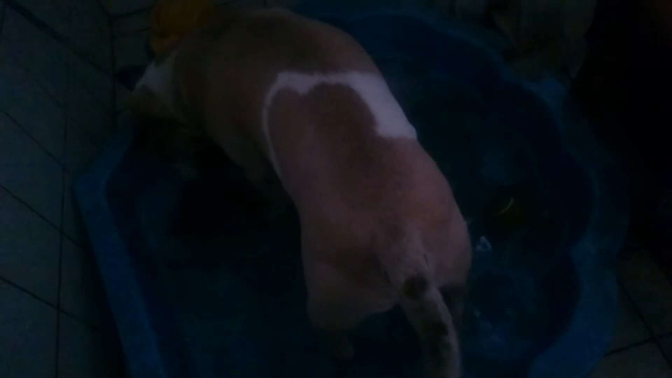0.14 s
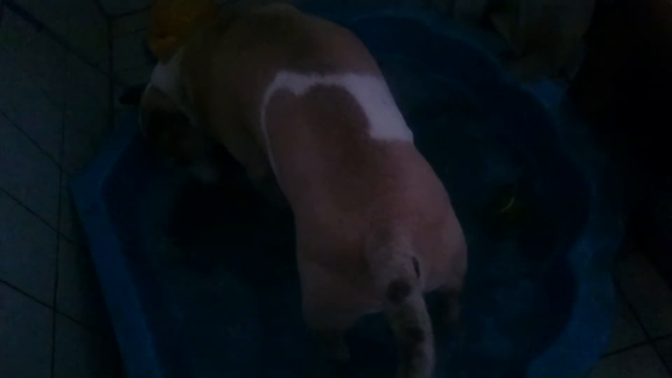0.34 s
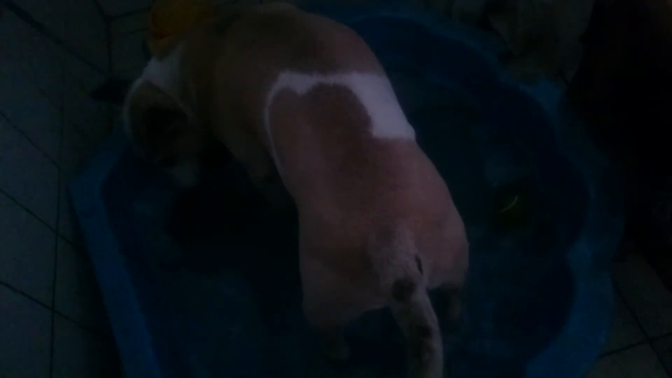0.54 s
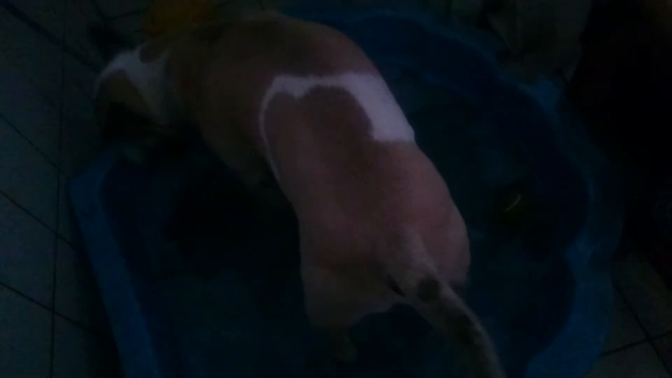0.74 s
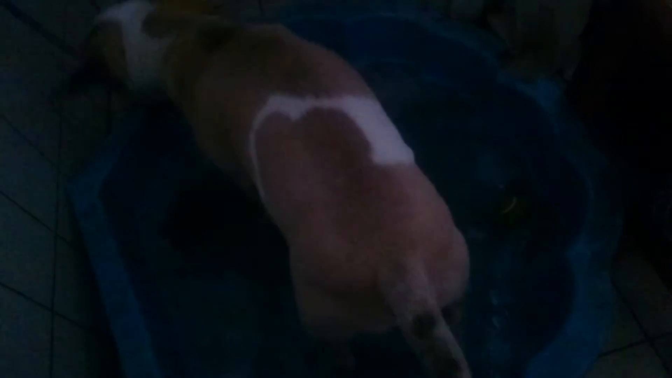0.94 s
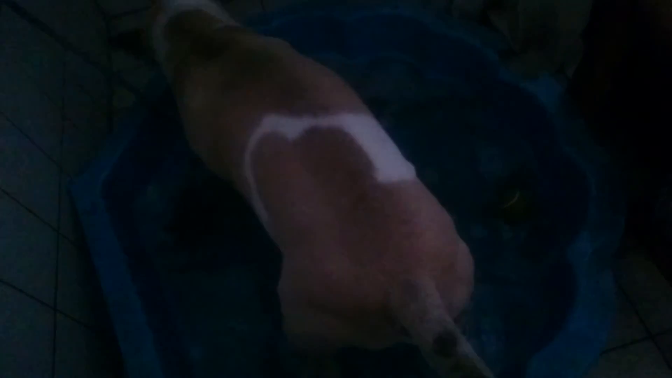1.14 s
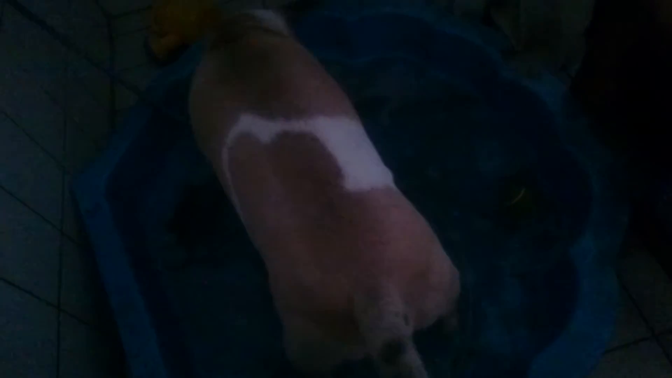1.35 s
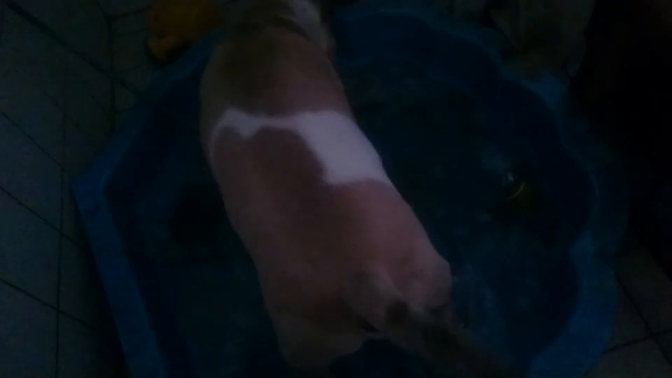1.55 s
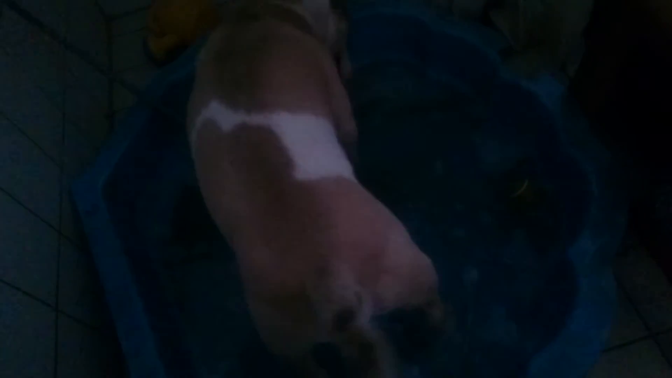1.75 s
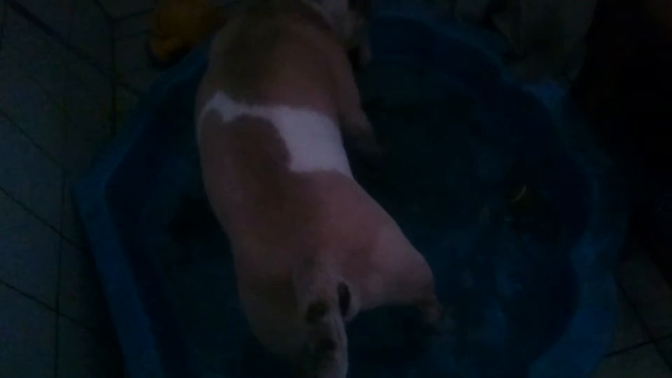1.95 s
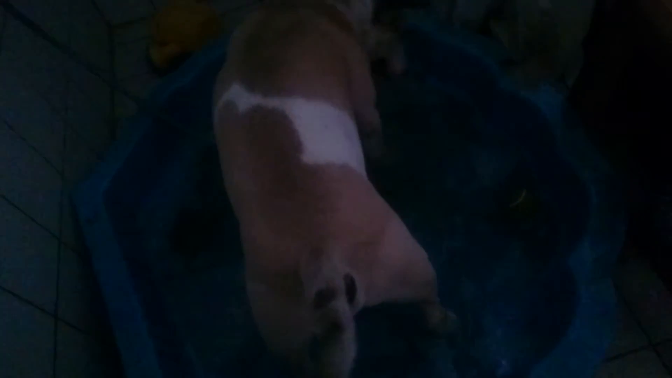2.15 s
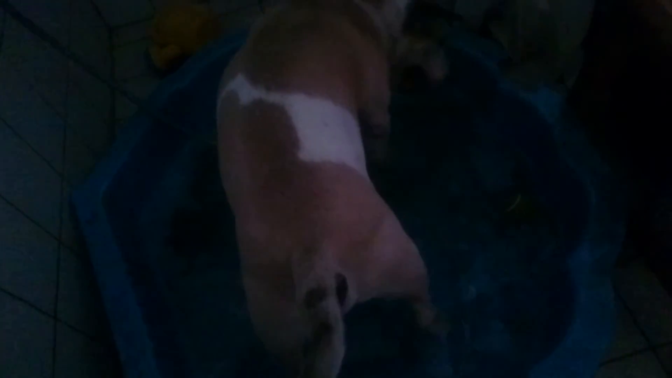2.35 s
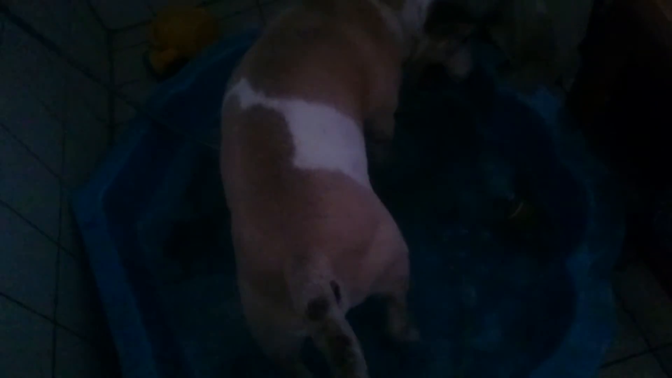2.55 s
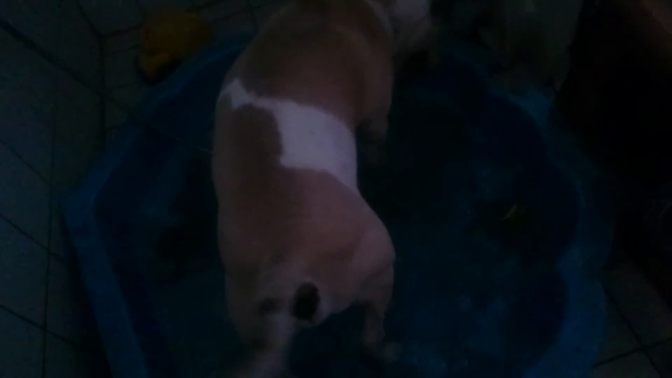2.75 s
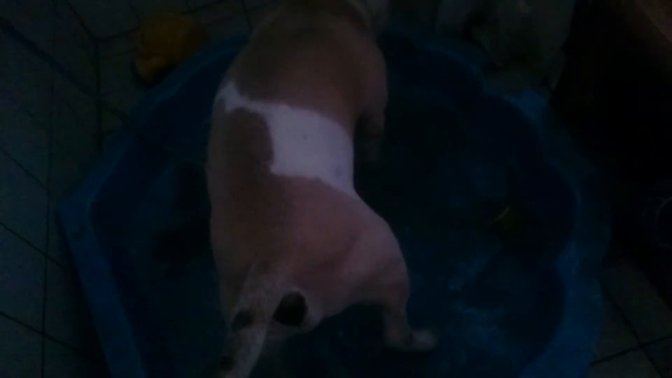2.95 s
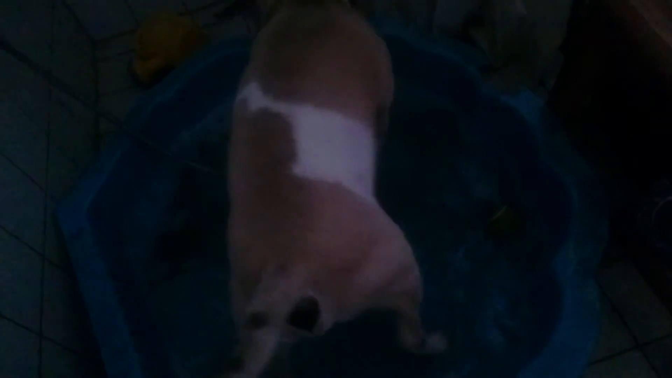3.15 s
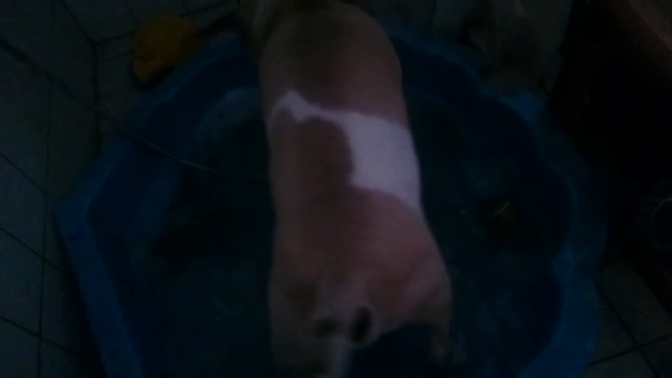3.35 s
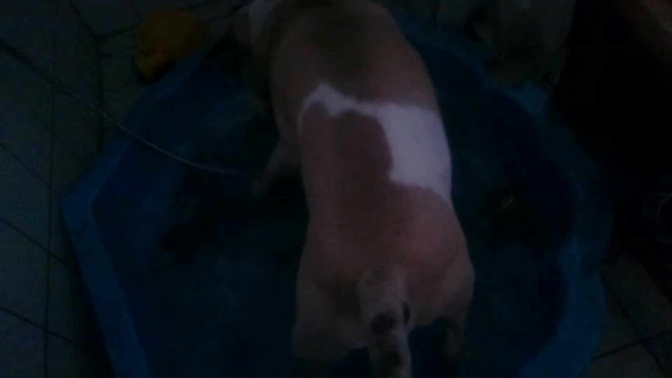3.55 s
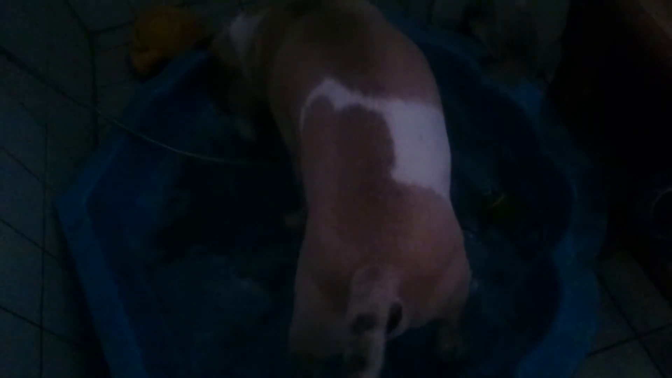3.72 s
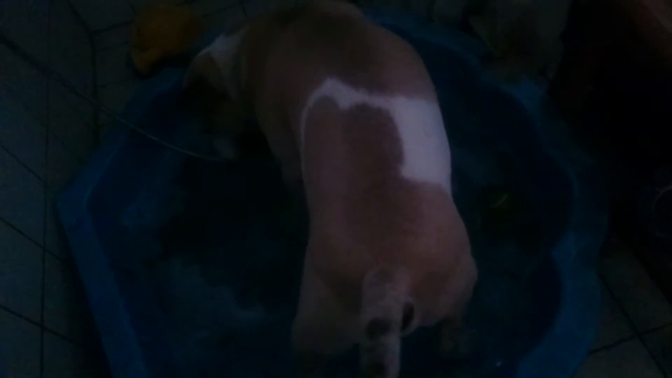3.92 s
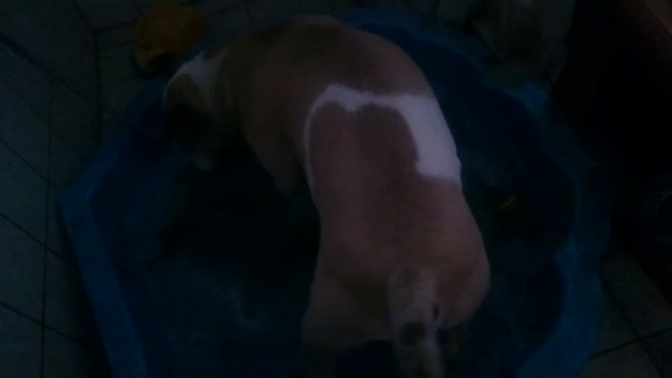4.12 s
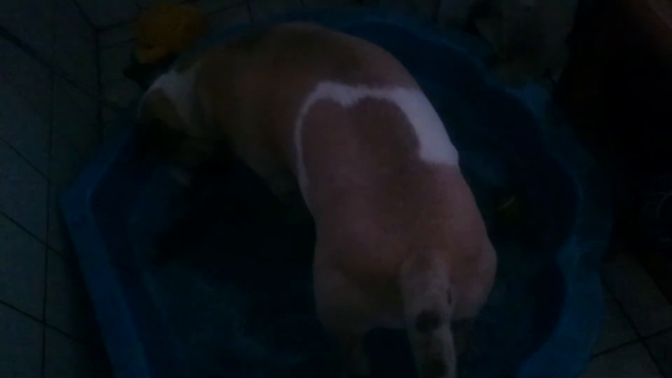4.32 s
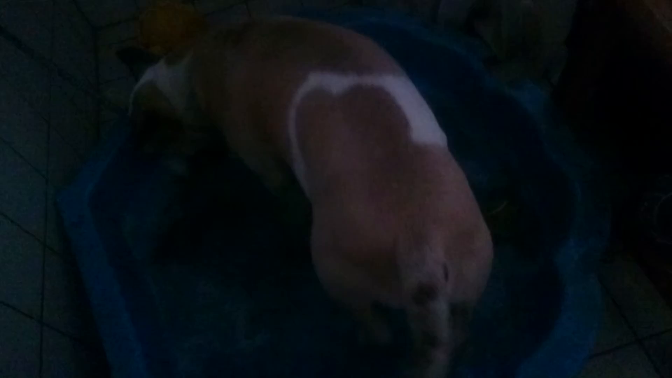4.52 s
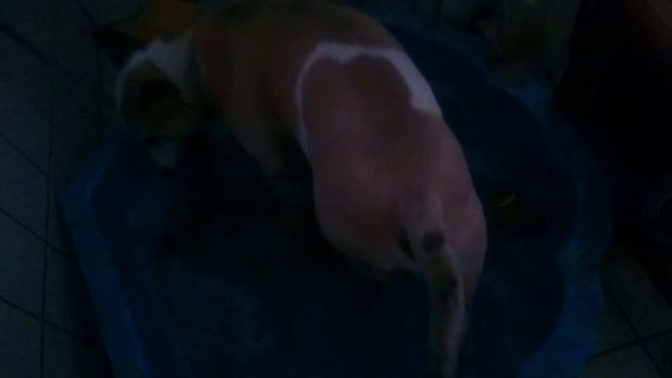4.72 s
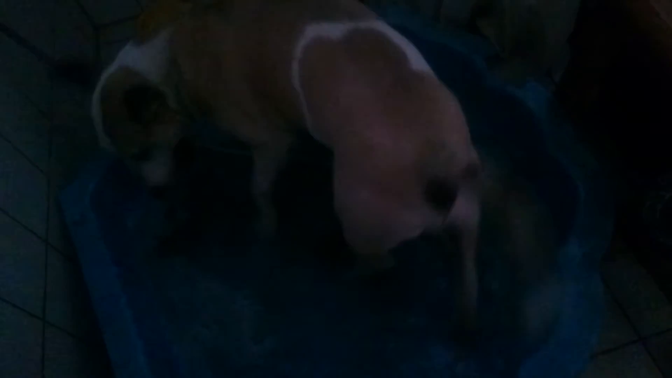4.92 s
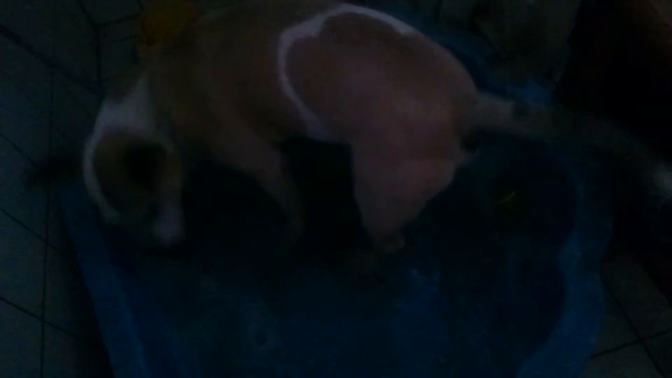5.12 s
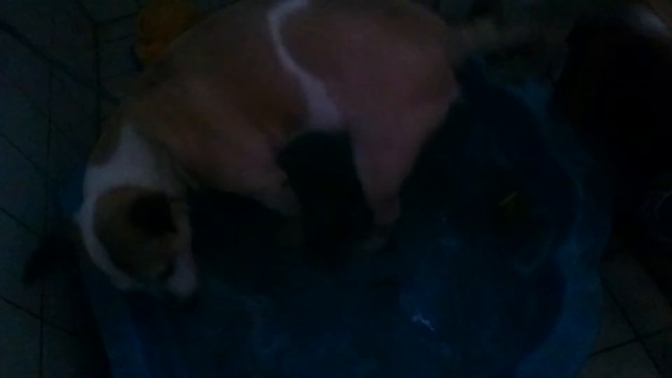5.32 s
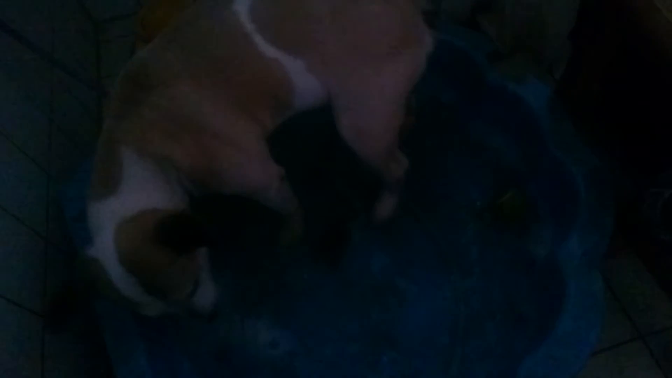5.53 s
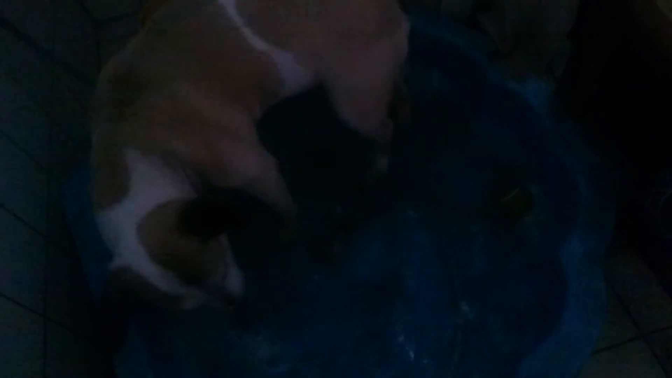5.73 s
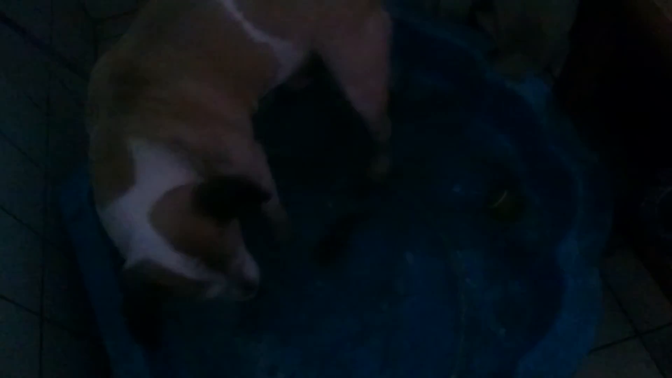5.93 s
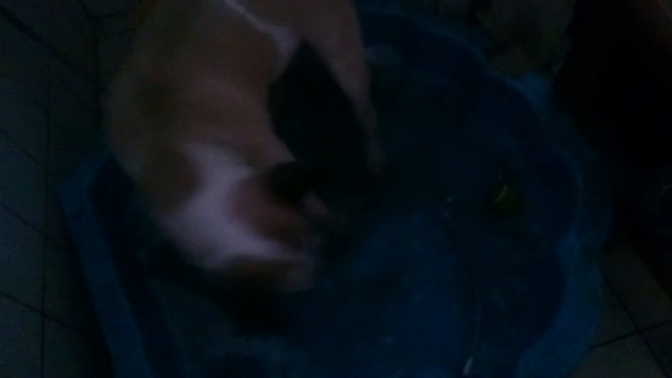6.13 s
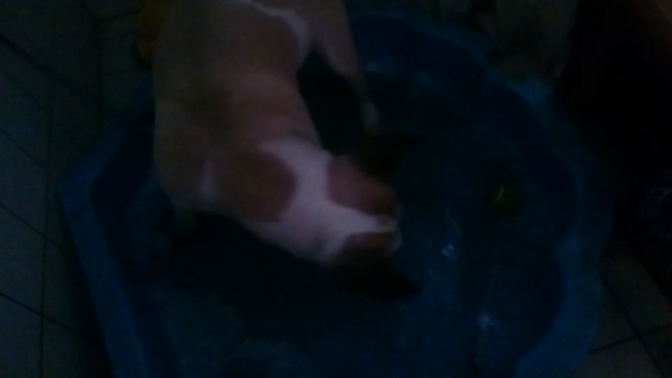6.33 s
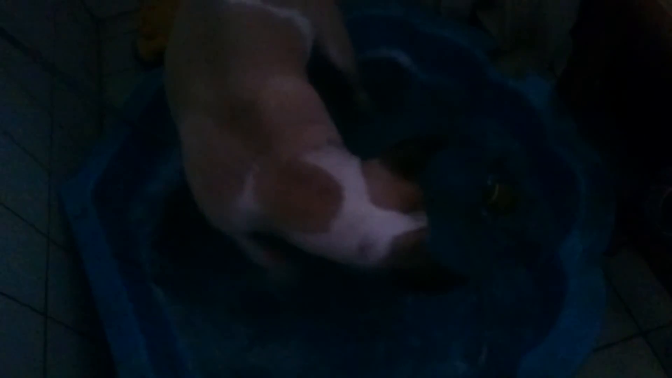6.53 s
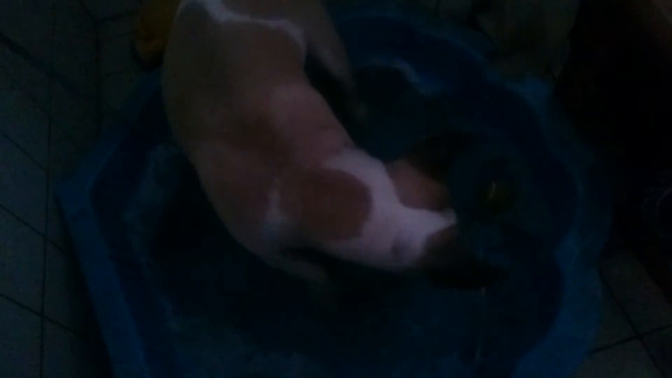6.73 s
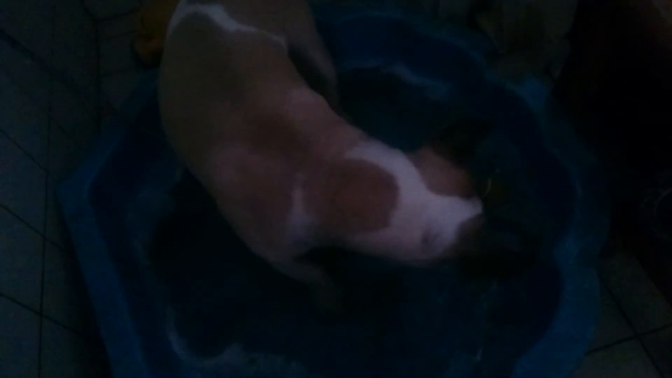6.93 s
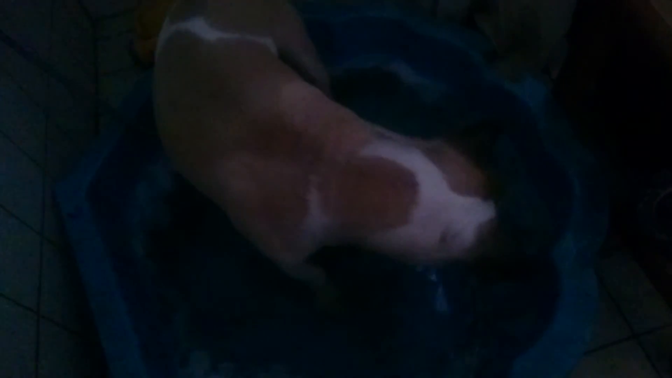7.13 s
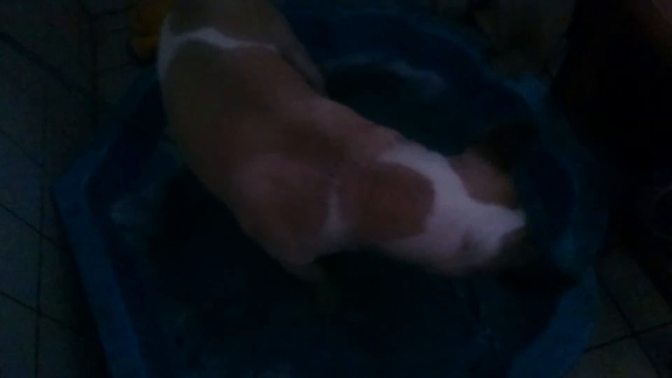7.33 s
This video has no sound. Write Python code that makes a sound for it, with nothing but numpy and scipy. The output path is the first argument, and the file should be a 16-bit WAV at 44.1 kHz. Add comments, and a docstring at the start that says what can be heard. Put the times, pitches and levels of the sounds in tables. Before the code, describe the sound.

Close, breathy panting, about three pants a second, runs throughout with brief gaps. Around it, water surges in short irregular bursts of bright spray, round bubble plops and ringing glugs, sharpest around four seconds and densest from five to six and a half. Paws thud on wet plastic. Distant echoing barks and steady faint hiss sit behind, in a short, lively tiled room.

```python
"""A tiled room with a shallow plastic pool: a panting dog steps about close to a two-port microphone.
Surges of spray, bubbles and slosh are built from crowds of small ringing bubbles.
Single plops, ringing glugs and knocks on the plastic floor stand out; each is a decaying tone.
Pants are noise through throat resonances. Far off another dog barks in three gliding partials.
Random-tap echoes place it all in the room, over a steady bed of air noise."""
import sys
import numpy as np
from scipy import signal
from scipy.fft import rfft, irfft, next_fast_len
from scipy.io import wavfile
from scipy.ndimage import uniform_filter1d

SR = 44100
rng = np.random.default_rng(int(sys.argv[2]) if len(sys.argv) > 2 else 0)


def master_out(mix):
    """Clip the mix to full scale and print it as 16-bit PCM to the path in sys.argv[1]."""
    frames = np.transpose(np.atleast_2d(mix))
    ceiling = np.clip(frames, -1, 1)
    pcm = np.round(ceiling * 32767).astype(np.int16)
    wavfile.write(sys.argv[1], SR, pcm)


N = 329494  # samples

# All levels are source levels, ahead of the final mix.
# spectrum of the air bed: (frequency [Hz], relative density [dB per Hz])
AIR = [(15, -40), (30, -8), (52, -3), (85, -3), (150, -6), (300, -11), (700, 1.5), (1200, -2), (2300, 0.5),
       (3800, -6.5), (5500, -15.5), (8500, -11.5), (11500, -29.5), (16000, -34)]
AIR_DB = -60

# distant barks: (time [s], length [s], first pitch [Hz], pitch it climbs towards [Hz],
# level of partial 1 [dB], of partial 2 [dB], of partial 3 [dB])
BARKS = [(.0, 0.099, 334, 370, -62.5, -47, -46.5), (0.285, 0.15, 349.6, 385, -72, -45, -46.5),
         (0.58, 0.14, 344.4, 398, -62.5, -53, -45), (0.795, 0.076, 408, 427, -90, -76, -54),
         (2.51, 0.059, 343, 391, -60.5, -48.5, -47.5), (4.792, 0.097, 369, 417.6, -55, -45, -47),
         (5.955, 0.076, 412, 435.4, -58, -35, -61)]

# echo of the tiles, before each source stretches it: (frequency [Hz], time to fall 60 dB [s])
TILES = [(200, 0.92), (700, 0.23), (2000, 0.21), (5000, 0.2), (12000, 0.18)]

# pants: (time near the middle of the breath out [s], nominal length [s], level [dB],
# mouth opening as a factor on the throat resonances [ratio], level of the breath in [dB])
PANTS = [(0.11, 0.056, -42.5, 0.95, -52.5), (0.389, 0.093, -43, 0.98, -55), (0.697, 0.1, -47.5, 0.95, -56),
         (1.032, 0.084, -43, 0.99, -66), (1.385, 0.1, -40, 1.01, -63), (1.694, 0.085, -39, 1, -56),
         (2.291, 0.13, -42, 0.98, -55.5), (2.629, 0.11, -39, 0.97, -56), (2.975, 0.11, -44, 1.13, -67),
         (3.302, 0.1, -40, 1, -57.5), (3.622, 0.1, -38.5, 0.93, -53.5), (4.317, 0.075, -36.5, 1.066, -52.5),
         (4.702, 0.18, -43.5, 1.176, -45), (5.066, 0.11, -41, 0.96, -50.5),
         (5.296, 0.095, -37.5, 1.32, -56), (6.172, 0.11, -36.5, 0.96, -56), (6.72, 0.081, -35, 1.04, -70),
         (7.134, 0.082, -43.5, 1.04, -52)]
# throat resonances at mouth opening 1: (frequency [Hz], width of the first pass [Hz], level [dB])
THROAT = [(283, 59, -14.5), (626, 112, -3), (1180, 130, 6), (1550, 252, 8.5), (2240, 360, 2),
          (2542, 490, 7), (3030, 310, 2.5), (3785, 410, 1), (4320, 480, -8)]
BREATH_HISS_DB = -21  # hiss at the teeth
# the soft breath in: delay and nominal length, and its narrower mouth
IN_LATE_S, IN_LENGTH_S, IN_MOUTH = 0.17, 0.13, 0.867

# paws knocking the plastic floor: (time [s], level [dB], starting pitch [Hz])
KNOCKS = [(1.435, -30, 645), (1.806, -40, 570), (3.034, -17.5, 510), (3.469, -29, 554), (5.557, -37, 780),
          (5.784, -40, 215), (5.95, -21.5, 655), (6.334, -24, 784), (6.349, -39, 191), (6.69, -37, 380),
          (7.389, -35.5, 653)]
# modes of the plastic sheet: (factor on the knock pitch [ratio], level [dB])
SHEET = [(.375, -28), (.62, -10), (1, -5)]

# large pockets of air that ring on: (time [s], level [dB], starting pitch [Hz])
GLUGS = [(1.586, -35.5, 1600), (2.799, -38, 1094), (2.824, -32, 1534), (2.925, -38.5, 597),
         (3.085, -29, 655), (3.859, -36, 1210), (3.976, -47, 283), (4.225, -31, 1800), (4.575, -25, 2060),
         (4.69, -32, 550), (4.70, -21.5, 883), (4.825, -22.5, 3010), (5.345, -34, 661),
         (5.384, -20.5, 1740), (5.64, -40, 890), (5.865, -37, 1720), (6.154, -17.5, 1338),
         (6.283, -40, 485), (6.46, -29.5, 586), (6.545, -22, 1090), (6.889, -31.5, 1043), (7.125, -52, 565)]
GLUG_CYCLES, GLUG_RISE = 13, 0.018  # ring length [cycles], pitch climb [ratio]

# surges of water pushed by a paw: (time of the crest [s], rise [s], hold [s],
# spray level [dB], bubbles level [dB], slosh level [dB])
SURGES = [(1.44, 0.033, 0.094, -81, -51, -79), (1.556, 0.12, .02, -60, -53, -78),
          (1.764, 0.018, 0.027, -50, -32.5, -70), (1.802, 0.055, 0.016, -35.5, -23, -36),
          (1.965, 0.32, 0.021, -61, -37.5, -59), (2.121, 0.18, 0.13, -49.5, -40.5, -49),
          (2.798, .03, 0.027, -72, -52, -75), (2.949, 0.11, 0.044, -50, -41, -62),
          (3.034, 0.13, 0.022, -44, -30, -36), (3.462, 0.022, .005, -82, -54.5, -53.5),
          (3.786, 0.039, 0.034, -55, -46.5, -77), (3.857, 0.082, 0.065, -42.5, -42, -77),
          (3.922, 0.018, 0.019, -42, -34, -53), (3.977, 0.026, 0.0026, -31, -51, -46),
          (3.997, 0.019, 0.004, -62, -29.5, -42), (4.122, 0.13, 0.13, -61.5, -49.5, -100),
          (4.567, 0.034, 0.0044, -71, -43.5, -80), (4.681, 0.094, 0.012, -43.5, -33.5, -43),
          (4.943, .02, 0.043, -53, -49, -75), (5.104, 0.29, 0.084, -82, -52.5, -48),
          (5.287, 0.15, 0.029, -37.5, -34.5, -48), (5.4, 0.11, .07, -42, -35.5, -48),
          (5.481, 0.068, 0.0043, -34, -27, -53), (5.555, 0.072, 0.0064, -31, -26, -34.5),
          (5.634, .1, 0.028, -34, -32, -54), (5.681, 0.055, 0.065, -33, -31.5, -53.5),
          (5.954, 0.1, .005, -56, -42.5, -43.5), (6.16, 0.14, 0.13, -45.5, -37, -57),
          (6.34, 0.061, 0.0075, -33, -24.5, -28.5), (6.403, .1, 0.083, -40, -33.5, -46.5),
          (6.53, 0.15, .08, -64.5, -43, -44.5), (6.692, 0.11, 0.21, -46, -41.5, -55.5),
          (6.953, 0.056, 0.0064, -58, -43.5, -56), (7.212, 0.083, 0.11, -64, -46.5, -76),
          (7.335, .1, 0.099, -61.5, -49.5, -55.5), (7.454, 0.072, .05, -45, -53, -52)]
RISE_DB = 30  # a surge climbs this far during its rise
# fall after the hold, one entry each for spray, bubbles, slosh: (time to fall 60 dB [s])
SETTLE_T60_S = [0.27, 0.36, 0.25]
# relative spectra of the stirred water: (frequency [Hz], density [dB per Hz])
SPRAY = [(2500, 7.5), (4600, 1), (7000, 0), (10400, -5), (13200, -9), (15300, -5), (16000, -4)]
BUBBLES = [(350, -41), (600, -21.5), (1100, -0.4), (2000, -2.5), (3600, -4.5), (4500, -13), (6500, -25),
           (9000, -24)]
SLOSH = [(90, -24), (200, -24), (400, -12.5), (640, 1.6), (950, 4), (1500, -15)]
# slow waves drumming on the pool floor: (frequency [Hz], relative density [dB per Hz])
RUMBLE = [(40, -28), (62, -18), (85, -8), (120, -11.5), (200, -22)]
RUMBLE_DB = -18  # over the smoothed slosh level
SPREAD_LAG = 14  # samples, either way, for sources across the pool

# plops and slaps: (time [s], level [dB], starting bubble pitch [Hz],
# smack level over the bubble [dB], left minus right [dB])
PLOPS = [(0.238, -30, 4500, -23, 5), (0.45, -22.5, 3010, -34, -1), (1.473, -30, 2100, -24, 3),
         (1.751, -17, 2280, -13.5, 4), (1.759, -13.5, 1290, -20, -4), (1.789, -18, 1080, -37, -23),
         (1.798, -13, 1070, -6.5, 4.5), (1.812, -14.5, 1420, -32, -5), (1.984, -15.5, 917, -40, 0),
         (2.081, -30.5, 1550, -11, 1), (2.14, -21.5, 2770, -6, 6), (2.152, -15, 1308, -39, 8.5),
         (2.259, -42, 2110, 0, .1), (2.803, -32, 3490, -31, 2), (2.912, -23.5, 2620, -18, .1),
         (3.024, -20, 2030, -39, -3), (3.046, -14, 1495, -12.5, 0), (3.777, -35, 1910, -31, -8),
         (3.84, -22.5, 2110, -18.5, 0), (3.92, -12.5, 3320, -14.5, 2), (3.956, -20, 838, -4.5, -7),
         (3.995, -9.5, 1430, -10, -1), (3.997, -10.5, 2920, -12, 7), (4.006, -4.5, 2610, -26, -15.5),
         (4.199, -32, 1940, -7, 3), (4.561, -38, 2000, -6.5, 3), (4.679, -30.5, 805, -28, -15),
         (4.965, -25.5, 2240, 0.5, -3.5), (5.03, -33, 1290, -58, -15), (5.169, -29.5, 1290, -34, 2),
         (5.211, -33, 1170, -4.5, 3), (5.349, -28, 1080, -13, -9), (5.469, -11.5, 2900, -19.5, -10.5),
         (5.56, -17, 3360, -25, -11), (5.67, -11.5, 3440, -5, 1), (5.743, -21, 2070, -11, -1),
         (5.78, -13, 2030, -21, 1), (5.916, -33, 1550, -20, 6), (5.958, -25.5, 1405, -6.5, -1),
         (6.144, -21.5, 1380, -27, -2.5), (6.32, -9.5, 2195, -20, 4), (6.336, -21, 1120, -28, 3),
         (6.355, -15.5, 1310, -21, -11), (6.388, -19, 3600, -9, 1), (6.463, -15, 1710, -23, 4),
         (6.679, -27, 1450, -23, -8), (6.83, -33, 2300, 5, 3.5), (6.955, -21, 2420, -8.5, 2.5),
         (7.196, -29.5, 2550, -22, -3), (7.217, -21, 1407, -38, -3), (7.279, -22, 1490, -34, -1),
         (7.441, -29, 3520, -1, 1.5)]
# spray of the smack: (frequency [Hz], relative density [dB per Hz])
SMACK = [(500, -29), (1200, -63), (2500, 4), (5000, 3), (9000, -4.5), (13000, -12.5), (15500, -9)]
PLOP_T60_S, SMACK_RISE_S = 0.036, 0.0011  # fall of smack and froth, attack of the smack
FROTH_S, FROTH_DB = 0.02, 1.5  # neighbours burst within this time, starting at this level over the bubble

PORT_LAG = 24  # samples by which the right port hears near sources later
# stereo width of the recorder: (frequency [Hz], gain on half of left minus right [dB])
WIDTH = [(30, 4), (80, 13), (250, 13), (500, 10), (1000, -0.15), (16000, -0.2)]
# tilt between the ports: (frequency [Hz], left minus right [dB])
TILT = [(60, -4.5), (110, -2.5), (200, 1.5), (380, -2.5), (700, -1.0), (1290, -1.5), (2380, -4.5),
        (4400, 2.5), (8120, -3), (15000, 5.0)]
EDGE_HZ = 15950  # upper band limit


def gain_of(db):
    """Turns decibels into an amplitude factor."""
    return 10 ** (np.asarray(db) / 20)


def evened(x):
    """Scales a sound to rms 1."""
    return x / np.sqrt(np.mean(x ** 2) + 1e-20)


def read(points, hz):
    """Reads a curve on a log-frequency axis."""
    f, value = np.transpose(points)
    return np.interp(np.log(hz + 1), np.log(f + 1), value)


def coloured(x, points):
    """Filters a sound by a spectrum in dB."""
    size = next_fast_len(x.shape[-1])
    gain = gain_of(read(points, np.fft.rfftfreq(size, 1 / SR)))
    return irfft(rfft(x, size) * gain, size)[..., :x.shape[-1]]


def add(mix, s, sound):
    """Mixes a sound in from time s, in place."""
    part = mix[..., round(s * SR):][..., :sound.shape[-1]]
    part += sound[..., :part.shape[-1]]


def resonate(x, hz, width_hz):
    """Rings one fixed resonance with gain 1 at its peak."""
    return signal.lfilter(*signal.iirpeak(hz, hz / width_hz, SR), x)


def bubble(hz, cycles, rise):
    """A pocket of air rings and dies; its pitch climbs as it nears the surface."""
    u = np.arange(int(4 * cycles * SR / hz) + 4) * hz / SR / cycles
    envelope = (1 - np.exp(-9 * u)) ** 2 * np.exp(-1.5 * u)
    return envelope * np.sin(2 * np.pi * cycles * (u + rise * u ** 2))


def air_bed():
    """Steady coloured noise, independent in each port."""
    return gain_of(AIR_DB) * evened(coloured(rng.standard_normal((2, N)), AIR))


def far_dog():
    """Three partials of each bark get through; the pitch climbs fast, then holds with a slight wobble."""
    out = np.zeros(N)
    for s, length, first_hz, top_hz, *partials_db in BARKS:
        u = np.linspace(0, 1, int(length * SR))
        wobble = 1 + 0.18 * uniform_filter1d(rng.standard_normal(12000), 150)[:len(u)]
        pitch_hz = top_hz - (top_hz - first_hz) * np.exp(-u / 0.209)
        turns = np.cumsum(pitch_hz * wobble) / SR
        voice = 0
        for k, db in enumerate(partials_db, 1):
            # higher partials start duller and open up
            level = gain_of(db - 1.3 * k * np.exp(-u / 0.032))
            voice = voice + level * np.sin(2 * np.pi * k * turns)
        add(out, s, voice * gain_of(-10.5 * u) * signal.windows.tukey(len(u), 0.22))
    return out


def room(x, slower):
    """Sparse random-sign echoes, different per port; each band dies at its own speed and three tails take turns."""
    out = np.zeros((2, N))
    turn = np.arange(N) / SR * 2.3
    for k in range(3):
        taps = np.zeros((2, SR // 2))
        at = np.arange(200, SR // 2 - 20, 20) + rng.integers(0, 20, (2, (SR // 2 - 201) // 20))
        np.put_along_axis(taps, at, rng.choice([-1., 1.], at.shape), 1)
        hz, t, z = signal.stft(taps, SR, nperseg=256)
        t60_s = slower * read(TILES, hz)[:, None]
        tail = signal.istft(z * gain_of(-60 * t / t60_s), SR, nperseg=256)[1]
        tail = tail / np.linalg.norm(tail[0])
        share = np.sqrt(2 / 3) * np.cos(np.pi * (turn + k / 3))  # squares sum to 1
        out += signal.oaconvolve(x * share, tail, axes=1)[:, :N]
    return out


def breath(length, db, mouth):
    """Rushing air rings the throat; a wider mouth lifts the resonances."""
    air = rng.standard_normal(12000)[:int(1.6 * length * SR)]
    throat = 0
    for hz, width_hz, part_db in THROAT:
        narrow = resonate(air, hz * mouth, width_hz)
        throat = throat + gain_of(part_db) * resonate(narrow, hz * mouth, 2 * width_hz)
    sound = evened(throat) + gain_of(BREATH_HISS_DB) * np.gradient(air)
    swell = np.sin(np.pi * np.linspace(0, 1, len(air))) ** 2
    return gain_of(db) * sound * swell


def panting():
    """Each pant pushes air out loud, then draws it in soft."""
    out = np.zeros(N)
    for s, length, db, mouth, in_db in PANTS:
        add(out, s - 0.88 * length, breath(length, db, mouth))
        breath_in = breath(IN_LENGTH_S, in_db, mouth * IN_MOUTH)
        add(out, s + IN_LATE_S - 1.2 * IN_LENGTH_S, breath_in)
    return out


def knocks():
    """The wet plastic sheet gives a short dull ring and a lower push."""
    out = np.zeros(N)
    for s, db, hz in KNOCKS:
        for factor, part_db in SHEET:
            add(out, s, gain_of(db + part_db) * bubble(hz * factor, 2.33, 0.035))
    return out


def glugs():
    """Single large bubbles ring on longer than the plops."""
    out = np.zeros(N)
    for s, db, hz in GLUGS:
        add(out, s, gain_of(db) * bubble(hz, GLUG_CYCLES, GLUG_RISE))
    return out


def surge_levels():
    """Each surge climbs, holds and settles; overlapping surges add in power."""
    step = 32  # samples
    t = np.arange(0, N + step, step) / SR
    power = 0
    for s, rise, hold, *crest_db in SURGES:
        climb_db = RISE_DB * np.maximum(s - t, 0) / max(rise, 0.005)
        settle_db = np.outer(60 / np.array(SETTLE_T60_S), np.maximum(t - s - hold, 0))
        power = power + gain_of(np.array(crest_db)[:, None] - climb_db - settle_db) ** 2
    return np.repeat(np.sqrt(power), step, axis=1)[:, None, :N]


def grains(points, per_s, cycles, spread_db, rise, count=24):
    """Bubbles of many sizes burst at random all over the pool; a few are large."""
    lo, hi = points[0][0], points[-1][0]
    strength = gain_of(spread_db * np.minimum(rng.exponential(1, N), 4))
    strength *= rng.random(N) < per_s / SR
    kind = rng.integers(0, count, N)
    out = np.zeros((2, N))
    pitches = np.geomspace(lo, hi, count) * rng.uniform(0.9517, 1.04, count)
    for k, hz in enumerate(pitches):
        shape = bubble(hz, cycles, rise)
        # sizes are log-spread, so each covers a band in proportion to its pitch
        shape = shape / np.linalg.norm(shape) * np.sqrt(hz)
        at = np.flatnonzero(strength * (kind == k))
        rings = np.outer(strength[at], shape)
        places = at[:, None] + np.arange(len(shape))
        pops = np.bincount(places.ravel(), rings.ravel(), N)[:N]
        # each pitch comes from its own side
        out += [pops, np.roll(pops, rng.integers(-SPREAD_LAG, SPREAD_LAG))]
    return evened(coloured(out, points))


def stirred_water():
    """Spray, bubbles and slosh follow the surges; slow waves drum on the pool floor."""
    levels = uniform_filter1d(surge_levels(), 120)
    # water lands in clumps, so spray and bubbles flicker together
    drift = uniform_filter1d(uniform_filter1d(rng.standard_normal(N), 700), 700)
    levels[:2] *= gain_of(2.96 * evened(drift))
    spray = grains(SPRAY, per_s=4000, cycles=2.2, spread_db=3.6, rise=0.05)
    bubbles = grains(BUBBLES, per_s=2600, cycles=6.72, spread_db=2.9, rise=0.085)
    # a few gurgles ring longer
    gurgles = grains(BUBBLES, per_s=160, cycles=16.0, spread_db=2.5, rise=0.03, count=30)
    bubbles += gain_of(-5) * gurgles
    slosh = grains(SLOSH, per_s=900, cycles=3.25, spread_db=2.5, rise=0.036)
    rumble = evened(coloured(rng.standard_normal((2, N)), RUMBLE))
    waves = gain_of(RUMBLE_DB) * uniform_filter1d(levels[2], 22000) * rumble
    return (levels * [spray, bubbles, slosh]).sum(0), waves


def plops():
    """A smack of spray, one clear bubble, and a short froth of six neighbours."""
    out = np.zeros((2, N))
    t = np.arange(6000) / SR
    draws = rng.random((len(PLOPS), 6, 2))
    noise = evened(coloured(rng.standard_normal((len(PLOPS), 6000)), SMACK))
    for (s, db, hz, smack_db, pan_db), draw, hiss in zip(PLOPS, draws, noise):
        attack = np.minimum(t / SMACK_RISE_S, 1)
        sound = gain_of(smack_db - 60 * t / PLOP_T60_S) * attack * hiss
        add(sound, 0, bubble(hz, 8.0, 0.028))
        for when, pitch in draw:
            late = when * FROTH_S
            froth_gain = gain_of(FROTH_DB - 60 * late / PLOP_T60_S)
            add(sound, late, froth_gain * bubble(hz * 1.8 ** (pitch - 0.55), 5.34, 0.087))
        sides_db = np.array([[pan_db], [-pan_db]]) / 2
        add(out, s, gain_of(db + sides_db) * sound)
    return out


def scene():
    """Near sources reach the right port late; the far dog is mostly echo."""
    water, waves = stirred_water()
    near = plops() + water + glugs() + knocks() + panting()
    # near sources lose their bass below about 190 Hz
    bass_cut = signal.butter(4, 190, "high", fs=SR, output="sos")
    near = signal.sosfilt(bass_cut, near) + waves
    near[1] = np.roll(near[1], PORT_LAG)
    barks = far_dog()[None]
    far = gain_of(-5) * barks * [[1], [0.3]] + gain_of(0.1) * room(barks, slower=1.94)
    return gain_of(-3.0) * near + gain_of(-2.0) * room(near, slower=0.77) + far + air_bed()


def record(dry):
    """The recorder reshapes the width and tilts the ports; then comes the band limit."""
    mid = (dry[0] + dry[1]) / 2
    side = coloured((dry[0] - dry[1]) / 2, WIDTH)
    left = coloured(mid + side, [(hz, db / 2) for hz, db in TILT])
    right = coloured(mid - side, [(hz, -db / 2) for hz, db in TILT])
    band_limit = signal.firwin(511, EDGE_HZ, window=("kaiser", 9), fs=SR)
    return signal.oaconvolve([left, right], band_limit[None], "same")


dry = scene()
out = record(dry)
master_out(out)
```